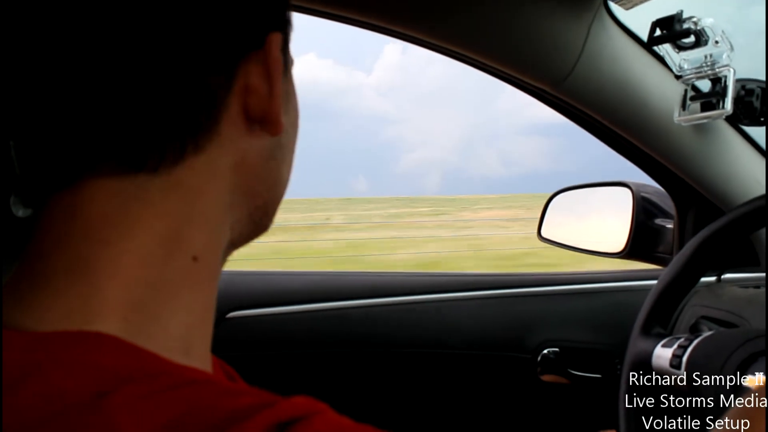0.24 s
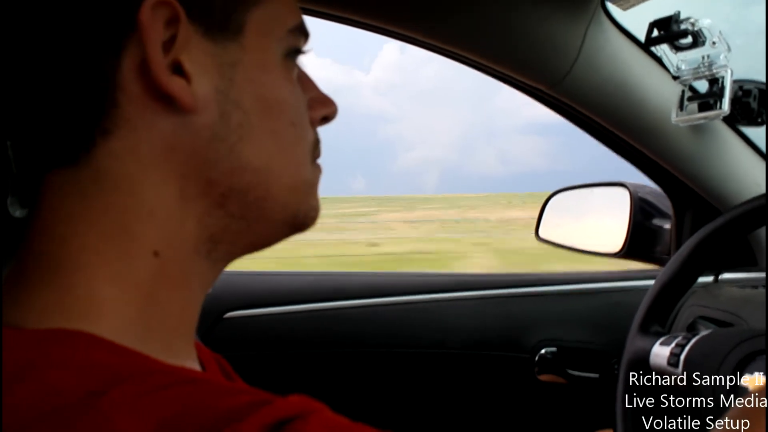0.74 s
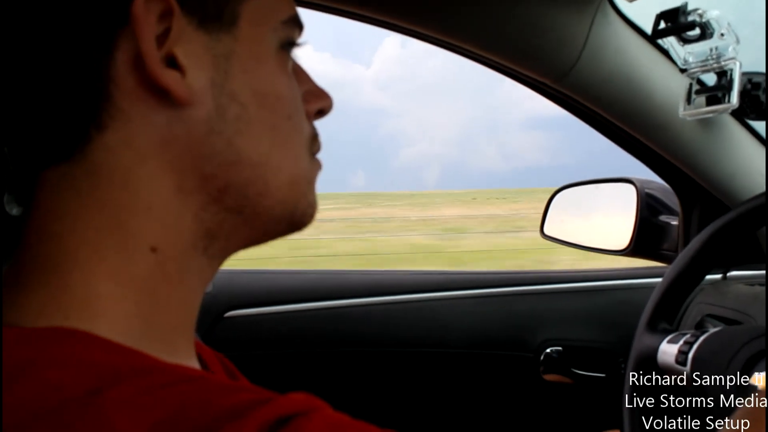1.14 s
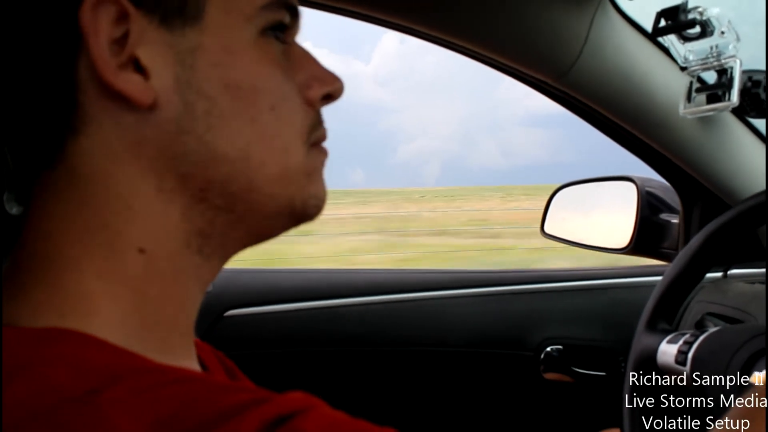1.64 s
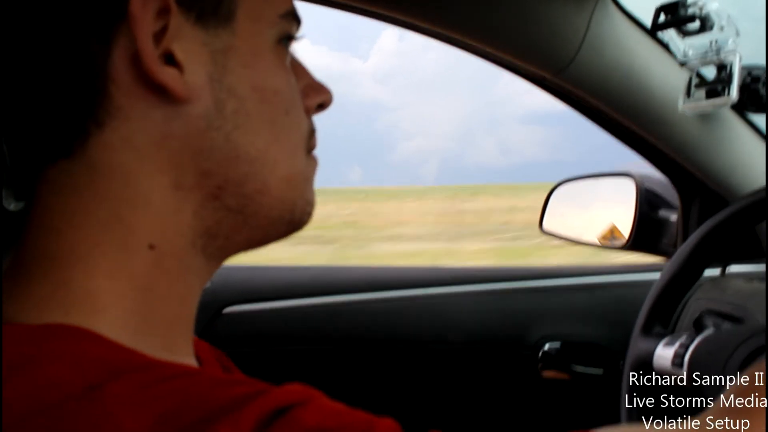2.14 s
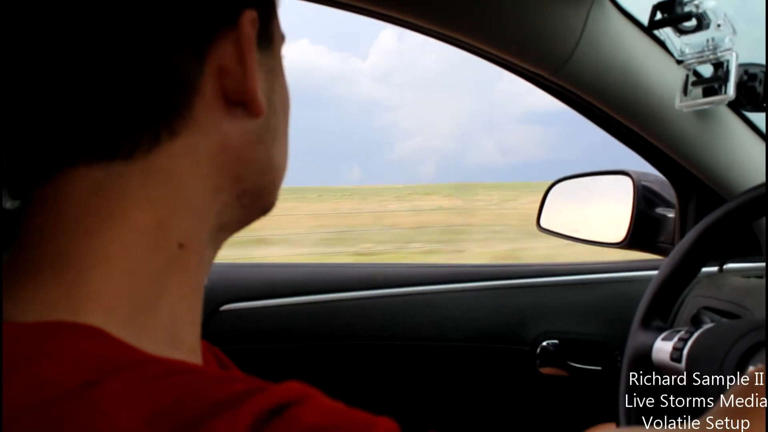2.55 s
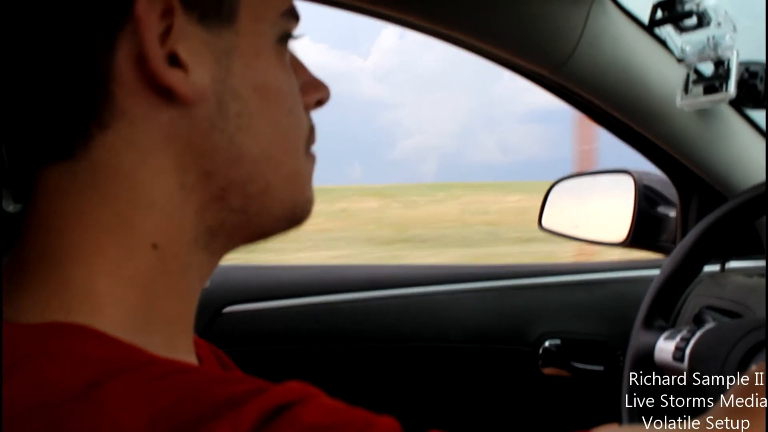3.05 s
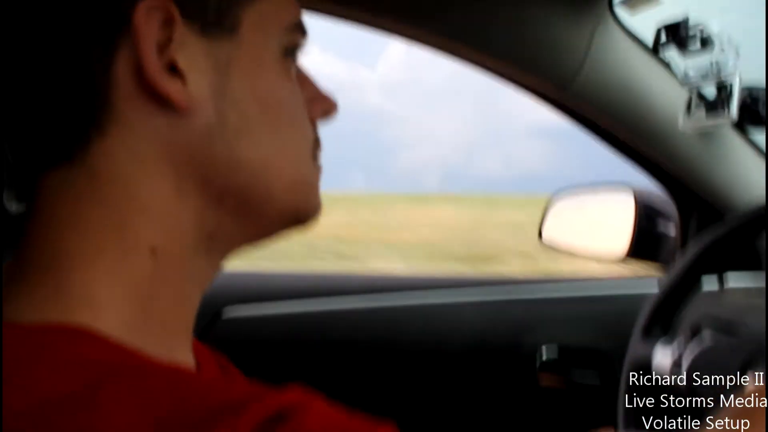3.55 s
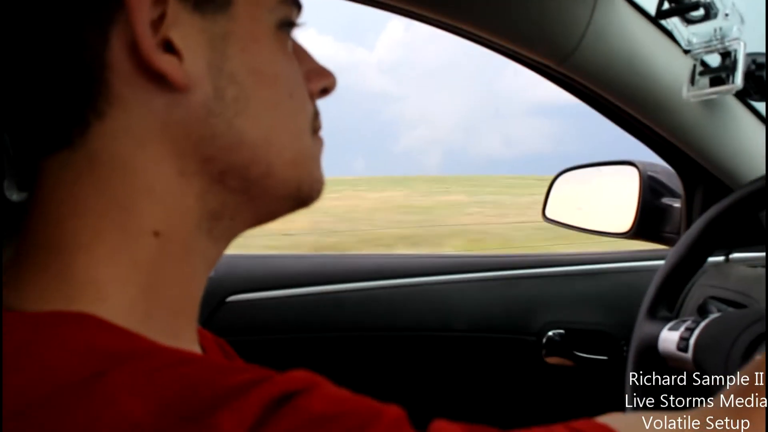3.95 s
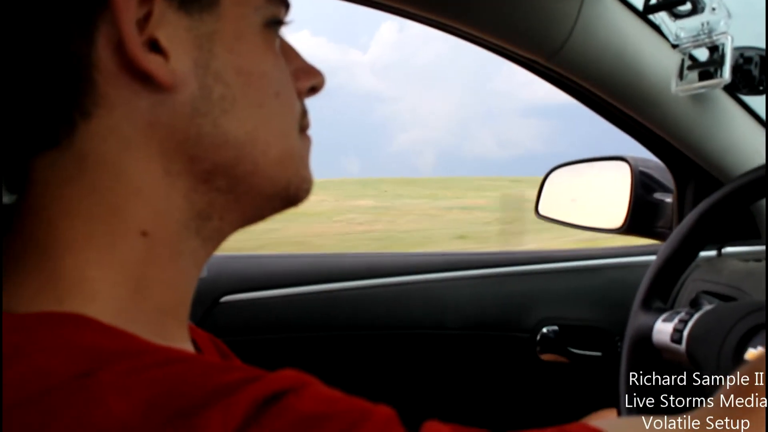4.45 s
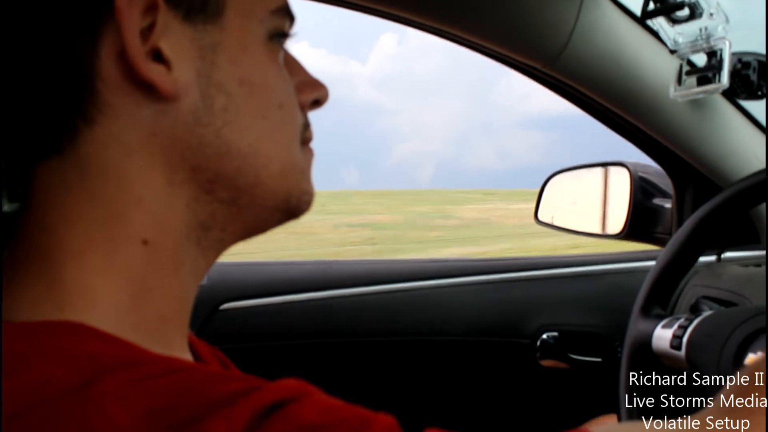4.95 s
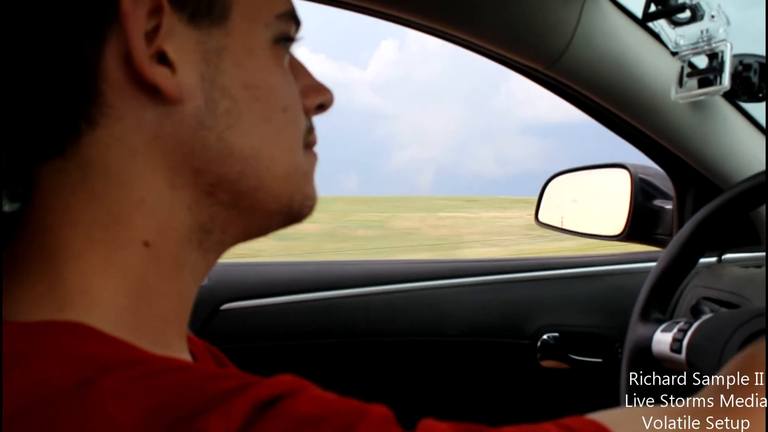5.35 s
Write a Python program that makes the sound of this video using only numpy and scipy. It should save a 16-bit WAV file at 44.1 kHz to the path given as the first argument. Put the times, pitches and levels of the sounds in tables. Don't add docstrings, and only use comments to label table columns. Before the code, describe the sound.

Wind thuds, punches and crackles hard on a bare microphone inside a moving car, over the steady roar of tyres on loose gravel.

```python
import sys
import numpy as np
from scipy import signal
from scipy.fft import rfft, irfft, next_fast_len
from scipy.io import wavfile
from scipy.ndimage import uniform_filter1d

SR = 44100
rng = np.random.default_rng(int(sys.argv[2]) if len(sys.argv) > 2 else 0)


def persist_wave(psi):
    counts = np.round(np.clip(psi, -1, 1) * 32767).astype(np.int16)
    wavfile.write(sys.argv[1], SR, np.atleast_2d(counts).T)


def gain_from_db(level_db):
    decades = np.asarray(level_db, float) / 20
    return 10 ** decades


N = 247342
T = np.arange(N) / SR
SIZE = next_fast_len(N + 8192)
HZ = np.maximum(np.arange(SIZE // 2 + 1) * SR / SIZE, 1)


def gain(points):
    hz, db = np.transpose(points)
    return gain_from_db(np.interp(np.log(HZ), np.log(hz), db, left=-120, right=-120))


def scaled(points, scale):
    return [(hz * scale, db) for hz, db in points]


def colour(x, shape):
    return irfft(rfft(x, SIZE) * shape, SIZE)[:N]


def unit(x):
    return x / np.sqrt(np.mean(x ** 2))


def walk(rate):
    k = int(SR / rate)
    steps = np.repeat(rng.standard_normal(N // k + 1), k)
    return unit(uniform_filter1d(uniform_filter1d(steps, k), k)[:N])


def restless(points, shared_db, own_db, rate):
    shape = gain(points)
    source = rfft(rng.standard_normal(SIZE))
    shared = walk(rate)
    out = 0
    lowest, highest = np.log2(points[0][0]) // 1, np.log2(points[-1][0]) + 1
    for centre in np.arange(lowest, highest, .5):
        band = np.clip(1 - 2 * np.abs(np.log2(HZ) - centre), 0, 1)
        level_db = shared_db * shared + own_db * walk(rate)
        out = out + irfft(source * shape * band, SIZE)[:N] * gain_from_db(level_db)
    return unit(out)


def curve(table):
    s, db = np.transpose(table)
    return np.interp(T, s, db)


def swells(s, db, width_s):
    return np.exp(-.5 * ((T[:, None] - np.array(s)) / np.array(width_s)) ** 2) @ np.array(db)


def clicks(s, size):
    return np.bincount(np.clip((s * SR).astype(int), 0, N - 1).ravel(), size.ravel(), N)


def jolts(s, db, points, turn):
    shape = gain(points)
    shape = shape / irfft(shape, SIZE)[0]
    bumps = colour(clicks(s, gain_from_db(db) * np.cos(turn)), shape)
    swings = colour(clicks(s, gain_from_db(db) * np.sin(turn)), 1j * shape)
    return bumps + swings


# (f/Hz, level/dB)
SNAP_COLOUR = [(400, 8), (700, -3.5), (1000, -5), (1500, -19.5), (2200, -27), (4000, -73)]


def frayed(s, db, spread_s, count=3):
    chance = rng.random((len(s), count, 3))
    place = np.arange(count) - 1
    level = db[:, None] - 1.9 * chance[..., 1] - 2.1 * np.abs(place)
    at = s[:, None] + spread_s * place * (0.356 + chance[..., 0])
    return jolts(at, level, SNAP_COLOUR, 2 * np.pi * chance[..., 2])


# (t/s, peak level/dB, thud share/dB, snap share/dB)
HARD_GUSTS = [(.0558, 0, -10, -18), (.1506, -2.5, -16, -17), (.1863, 0, -34, -27), (.1986, -4.5, -4, -2.5),
              (.8455, -2, -18, -31), (.9345, -6, 5.5, -8), (.9387, 4, -15, -12), (.9455, 4.5, -14, -8),
              (.9635, -3, -6, -7), (.978, -1.5, -29, -33), (.9985, -6.5, -10, -16.5),
              (1.1527, -0.5, -17, -15), (1.3402, -5, -6, -19.5), (1.61, -12.5, -9, -12),
              (1.6322, -9.5, -16, -3), (1.6402, -11, -9, -10), (1.7241, -6.5, -21, -21),
              (2.6874, -6.5, -17, -24), (3.0755, 3, -33, -25), (3.112, -2.5, -6, -15),
              (3.1174, -2, -30, -12), (3.6044, -4.5, -7, -24), (3.8127, -3.5, -3, -23),
              (3.8921, -3, -8, -32), (4.0698, -7, -17, -5.5), (4.2671, -1, -36, -20),
              (4.4328, 0.5, -1, -21), (4.7248, -9, -20, -1.5), (4.8796, -10.5, -15, -5),
              (5.4761, -4.5, -6, -19)]
# (t/s, peak level/dB, snap share/dB)
PUNCHES = [(0.2601, -7.5, -20), (0.3163, -6, -14), (0.371, -10, -32), (0.4164, -12.5, -28),
           (0.6211, -9, -28), (0.7501, -6, -18.5), (0.7896, -10, -19), (1.137, -8, -36),
           (1.1606, -11.5, -8.5), (1.2158, -10, -14), (1.5176, -10, -29), (1.601, -8.5, -15),
           (1.7488, -9.5, -28), (1.867, -13.5, -14), (2.7252, -14, -21), (3.2855, -16, -26),
           (3.62, -10, -29), (3.7293, -9.5, -25), (3.91, -7, -35), (3.9802, -11, -17), (3.9922, -5, -20),
           (4.0834, -10.5, -27), (4.3251, -9, -26), (4.3444, -6.5, -41), (4.418, -9.5, -19),
           (4.5251, -6.5, -30), (5.0331, -6.5, -28), (5.1414, -13, -14), (5.2862, -7, -17),
           (5.4822, -7, -27)]
# (t/s, thud peak level/dB, punch under thud/dB)
THUMPS = [(0.045, -22, 5), (0.1931, -7.5, 5), (0.5098, -2, 18), (0.6537, -7, 17), (0.8278, -1.5, 12),
          (0.855, -17, -2), (1.243, -14.5, 10), (1.5319, -5.5, 6), (1.5387, -10.5, -2), (2.0892, -0.5, 18),
          (2.0979, -4, 8), (2.217, -18, 12), (2.6805, -6, -4), (2.8802, -5.5, 11), (3.0573, -2.5, 4),
          (3.1374, -11.5, -1.5), (3.312, -11.5, 10), (3.5265, -2.5, 21), (3.56, -4.5, 21),
          (4.077, -3.5, 13.5), (4.1851, -15.5, -3.5), (4.7155, -3.5, 2), (4.7751, -1, 20), (4.789, -3.5, 4),
          (4.855, -6.5, 9), (4.9338, -1, 8), (4.9401, -0.2, 14), (4.974, -9, 6), (5.0244, -10, 5),
          (5.0637, 2.7, 11)]
PUNCH_THUD_DB, THUMP_SNAP_DB = -5.5, -18
# (f/Hz, level/dB)
THUD_COLOUR = [(20, -21), (60, -4.5), (120, 0.5), (200, -4.5), (400, -26)]
# (f/Hz, level/dB)
PUNCH_COLOUR = [(80, -27), (190, -0.5), (300, -0.5), (450, -5), (700, -18), (1200, -53)]


def gusts():
    swirls = HARD_GUSTS + [(s, db, PUNCH_THUD_DB, snap) for s, db, snap in PUNCHES]
    swirls = swirls + [(s, db - under, under, THUMP_SNAP_DB) for s, db, under in THUMPS]
    s, peak_db, thud_db, snap_db = np.transpose(swirls)
    turn, size, lag, wake_turn = rng.random((len(s), 4)).T
    out = jolts(s, peak_db + thud_db - 3.0, THUD_COLOUR, 2 * np.pi * turn)
    smallness = np.digitize(snap_db + 8 * size, (-18, -10))
    at = np.array([s, s + 0.00395 + 0.00515 * lag])
    db = np.array([peak_db - 1.5, peak_db - 9.5])
    turns = 2 * np.pi * np.array([turn, wake_turn])
    for k, scale in enumerate((.8, 1.05, 1.45)):
        some = smallness == k
        out = out + jolts(at[:, some], db[:, some], scaled(PUNCH_COLOUR, scale), turns[:, some])
    return out + frayed(s, peak_db + snap_db, 0.00313)


# (t/s, peak level/dB)
CRACKLES = [(0.246, -14), (0.254, -22), (0.689, -27), (0.788, -22), (0.964, -10), (0.971, -27),
            (0.984, -18), (1.204, -27), (1.224, -32), (1.525, -21), (1.614, -9), (1.76, -19), (1.722, -20),
            (.313, -24), (.05, -18), (4.26, -19), (4.066, -14.5), (5.058, -19), (5.473, -18.5),
            (1.577, -24), (2.329, -16), (3.037, -19), (3.159, -20.5), (3.946, -15.5), (4.411, -21),
            (4.749, -8), (4.764, -20), (4.877, -38), (5.029, -37)]


def crackle():
    s, db = np.transpose(CRACKLES)
    return frayed(s + 0.00208, db - .6, 0.00408)


def duck(x):
    knee_db, share = -21.5, 0.39
    attack_s, release_s = 0.013, 0.14
    power = x ** 2
    for tau in (attack_s, release_s):
        keep = np.exp(-1 / (tau * SR))
        power = signal.lfilter([1 - keep], [1, -keep], power)
    return -share * 10 * np.log10(1 + power / gain_from_db(knee_db) ** 2)


# (t/s, level/dB, half width/s)
LULLS = [(.3, -1, 0.037), (.57, -0.5, 0.034), (1.04, -2.5, 0.023), (1.4, -1.5, 0.028), (2.77, -3, 0.04),
         (3.185, -9, 0.058), (3.68, -1.5, .03), (4.13, -5, 0.033), (4.49, -3.5, 0.031), (4.87, -2, 0.036),
         (5.19, -1.5, 0.024)]


def lulls():
    return swells(*np.transpose(LULLS))


# (t/s, level/dB)
DRAUGHT = [(0.0, -19), (0.08, -25), (0.47, -34.5), (0.7, -33), (0.81, -25), (1.27, -36), (1.51, -28.5),
           (1.67, -23.5), (2.09, -31.5), (2.22, -24.5), (3.03, -23.5), (3.22, -20), (3.54, -25),
           (3.98, -25), (4.34, -26.5), (4.94, -24), (5.06, -27), (5.61, -30.5)]
# (f/Hz, level/dB)
BUFFET_COLOUR = [(50, -29), (120, 0), (200, 5), (300, -2), (500, -14.5), (800, -23.5), (1500, -40)]


def buffeting(duck_db, lull_db, count=900):
    level_db = curve(DRAUGHT) + 0.39 * duck_db + 1.23 * lull_db + 1.75
    out, flap = 0, walk(25.11)
    for scale in (.7, 1.05, 1.5):
        chance = rng.random((count, 3)).T
        size = np.sign(chance[1] - .5) * gain_from_db(-9.0 * chance[2])
        swarm = colour(clicks(chance[0] * N / SR, size), gain(scaled(BUFFET_COLOUR, scale)))
        out = out + swarm * gain_from_db(2.2 * flap + 1.8 * walk(25.12))
    return gain_from_db(level_db) * unit(out)


# (t/s, roar level/dB)
RIDE = [(0, -38.5), (.28, -42), (.55, -39.5), (.8, -35.5), (.95, -38), (1.1, -41.5), (1.45, -45.5),
        (1.75, -42), (2.1, -36.5), (2.35, -34.5), (2.65, -34.5), (3.0, -35), (3.45, -35.5), (3.8, -35.5),
        (3.93, -40.5), (4.7, -38), (5.2, -44.5), (5.61, -39)]


def ride(duck_db, lull_db):
    return curve(RIDE) + duck_db + lull_db + 1.5


# (f/Hz, level/dB)
ROAR_COLOUR = [(200, -9), (500, 10.5), (800, 4), (1100, 1.5), (1350, -1), (1450, 3.5), (1550, -3.5),
               (1700, 0.5), (2500, -2.5), (3100, -5), (3900, -13.5), (5000, -24.5), (7000, -34)]


def tyres(roar_db, flutter):
    return gain_from_db(roar_db + 4.0 + 0.53 * flutter) * restless(ROAR_COLOUR, shared_db=.5, own_db=0.73, rate=20)


# (t/s, shudder level/dB, boom level/dB)
RUTS = [(.01, 2, -2), (.07, 0, 2), (.2, 3, -7), (.33, 7, -7), (.51, -11, -2), (.79, -1, 5.5),
        (.95, -5, 8.5), (1.11, 4, -1), (1.76, 3, 1), (1.55, -5, -2), (1.33, -3, -4), (3.22, 2, 4),
        (2.05, -13, 4), (2.44, -2, 4), (2.69, 7, 7.5), (2.86, 3, 2), (3.12, 10.5, 9.5), (3.34, 3.5, -2),
        (3.48, -6.5, 2), (3.64, 0, -9), (4.08, 8, -1), (4.14, -5, 0), (4.28, 8.5, 3.5), (4.36, -8, 1),
        (4.94, 6, 8), (5.55, -8, 4), (5.61, 7, -0.5)]
# (f/Hz, level/dB)
SHUDDER_COLOUR = [(8, -23), (20, -2), (40, 0), (70, -5.5), (110, -11), (200, -22)]
# (f/Hz, level/dB)
BOOM_COLOUR = [(50, -14.5), (90, -4), (110, -1.5), (126, 3.5), (145, -4), (190, -7), (300, -12)]


def body_and_cabin(effort_db):
    rut_s, rock_db, pump_db = np.transpose(RUTS)
    width_s = 0.026
    shudder_db = -25.5 + 0.88 * effort_db + swells(rut_s, rock_db, width_s)
    boom_db = -25 + 0.73 * effort_db + swells(rut_s, pump_db, width_s)
    shudder = gain_from_db(shudder_db + 0.2) * restless(SHUDDER_COLOUR, shared_db=0.5, own_db=0.8, rate=12)
    boom = gain_from_db(boom_db + 2.0) * restless(BOOM_COLOUR, shared_db=-0.6, own_db=1.8, rate=22)
    return shudder + boom


# (t/s, lift level/dB)
PUFFS = [
    (.05, 1.5),
    (.75, 1),
    (2.41, 1.5),
    (2.64, 1.5),
    (2.98, 1.5),
    (3.6, 4.5),
    (3.78, 4),
    (4.25, 2.5),
    (4.78, 1),
]


def puffs():
    return swells(*np.transpose(PUFFS), 0.027)


# (f/Hz, level/dB)
HISS_COLOUR = [(2500, -21), (4000, -0.5), (5500, -1.5), (7000, -0.5), (8500, -6), (10500, -10.5),
               (12500, -20), (14600, -40), (15200, -43), (15400, -38), (15700, -33)]


def gap_hiss(roar_db, effort_db, lull_db, lift_db, flutter):
    over_roar_db = -12.5 - .5 * T - 0.26 * (effort_db - lull_db) + lift_db
    level_db = roar_db + over_roar_db + 0.86 + 1.3 * flutter
    return gain_from_db(level_db) * restless(HISS_COLOUR, shared_db=-0.5, own_db=-0.1, rate=10)


# (f/Hz, level/dB)
WHISTLE_COLOUR = [(5500, -18), (7000, -3), (7600, -1), (8400, -14), (10000, -25)]


def whistle(roar_db, lift_db):
    breath = unit(colour(rng.standard_normal(N), gain(WHISTLE_COLOUR)))
    return gain_from_db(roar_db - 30 + 3.3 * lift_db) * breath


# (t/s, peak level/dB)
BUZZES = [
    (2.3341, -26),
    (2.5506, -34.5),
    (2.598, -38),
    (2.8194, -28),
    (2.8759, -35),
    (2.9901, -25.5),
    (3.0144, -37),
    (3.1009, -40),
]
# (f/Hz, width/Hz, level over roar/dB)
TRIM_RINGS = [
    (1690, 110, -17),
    (2480, 90, -19),
]


def trim(roar_db):
    fits = 0
    for hz, width, over_db in TRIM_RINGS:
        ring = 1 / (1 + 1j * (HZ - hz) / (width / 2))
        fits = fits + gain_from_db(over_db + 5.5 * walk(30)) * unit(colour(rng.standard_normal(N), ring))
    s, db = np.transpose(BUZZES)
    swell = swells(s + .008, gain_from_db(db - 5.5), 0.0047)
    return gain_from_db(roar_db) * fits + swell * np.sin(2 * np.pi * TRIM_RINGS[1][0] * T)


# (t/s, peak level/dB, f/Hz)
GRIT_HITS = [(0.1394, -41, 6690), (1.6984, -39, 7140), (2.4094, -31, 6540), (2.8075, -39, 6000),
             (2.8714, -41, 6080), (3.3034, -39, 6760), (3.5104, -32, 6400), (3.5474, -35, 6320),
             (4.0074, -34, 7600), (4.0317, -37, 6920), (4.0614, -39, 6540), (4.1844, -39, 7000),
             (4.7204, -38, 6720), (4.7414, -44, 6650), (5.441, -43, 6490), (4.8775, -22, 1800),
             (4.7555, -22, 1900), (5.062, -25, 1500), (.9455, -18, 3200), (.9635, -20, 1700)]


def grit():
    out, t = np.zeros(N + 512), np.arange(512) / SR
    for s, db, hz in GRIT_HITS:
        i = int(s * SR)
        out[i:i + 512] += gain_from_db(db) * np.exp(-t / .0005) * np.sin(2 * np.pi * hz * t)
    return out[:N]


def scene():
    thumps = gusts() + crackle()
    duck_db, lull_db, lift_db = duck(thumps), lulls(), puffs()
    wind = thumps + buffeting(duck_db, lull_db)
    roar_db = ride(duck_db, lull_db)
    effort_db = roar_db + 39
    flutter = walk(23.63)
    car = tyres(roar_db, flutter) + body_and_cabin(effort_db)
    gap = gap_hiss(roar_db, effort_db, lull_db, lift_db, flutter) + whistle(roar_db, lift_db)
    return (wind + car + gap + trim(roar_db) + grit())[None]


def low_pass(x):
    return signal.sosfilt(signal.butter(12, 15720, fs=SR, output="sos"), x)


def record(dry):
    settle = np.minimum(T / .003, 1)
    mix = np.clip(1.004 * dry * settle, -.99, .99)
    return low_pass(mix)


dry = scene()
out = record(dry)
persist_wave(out)
```